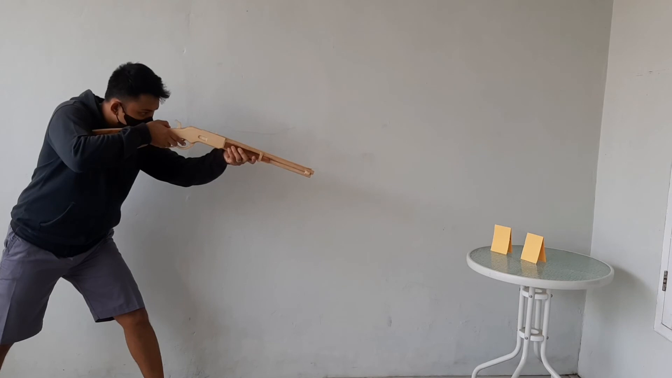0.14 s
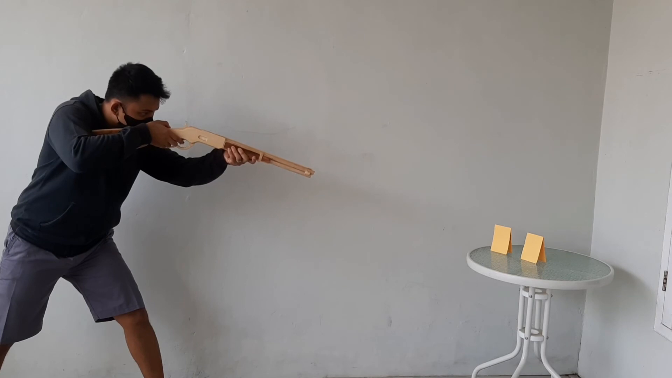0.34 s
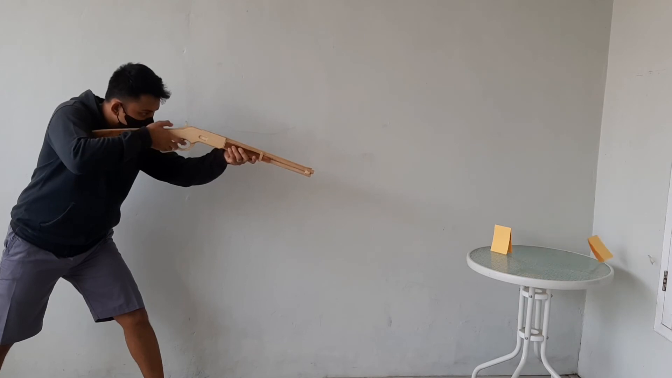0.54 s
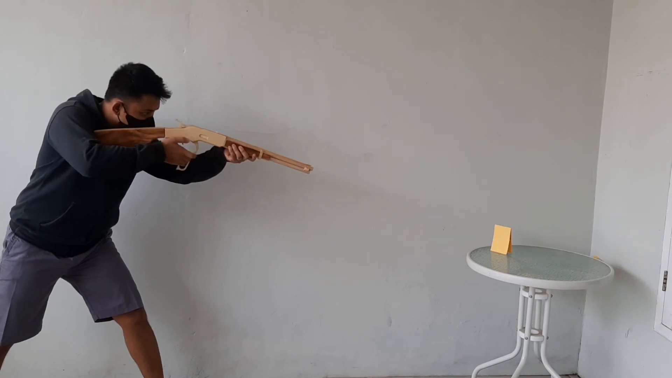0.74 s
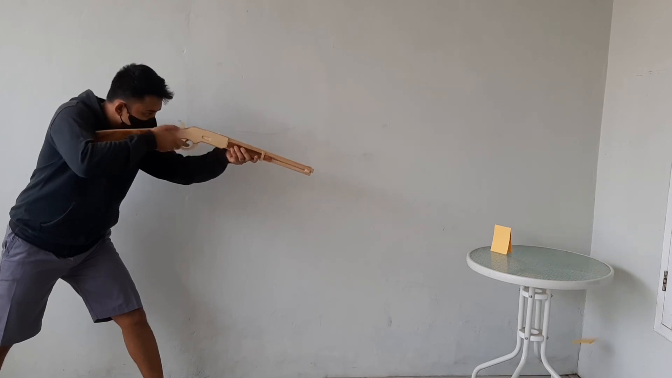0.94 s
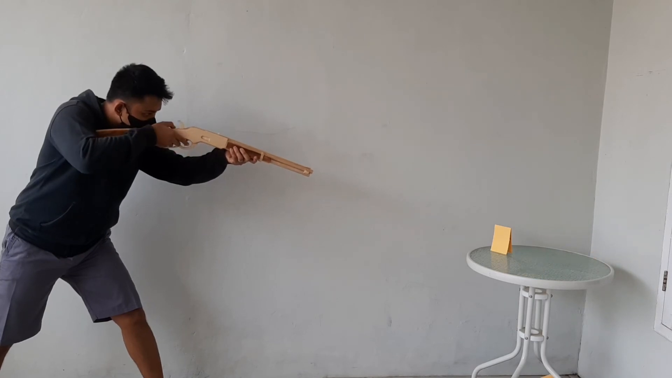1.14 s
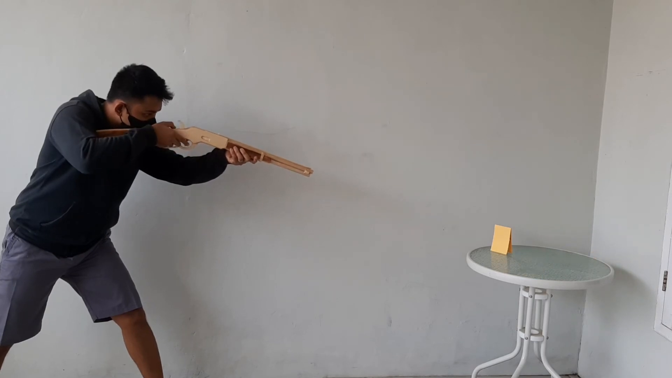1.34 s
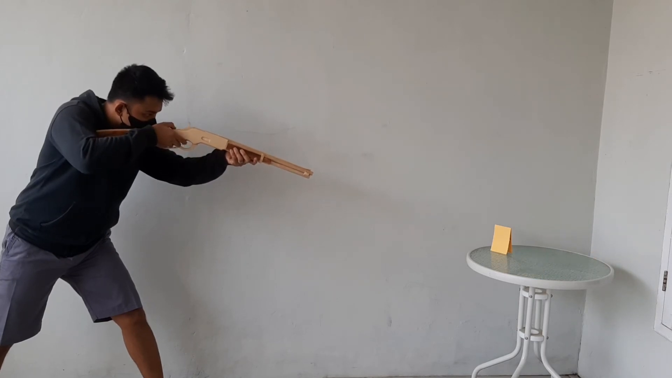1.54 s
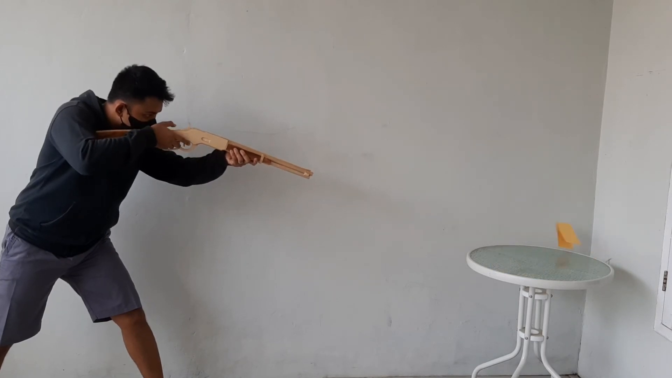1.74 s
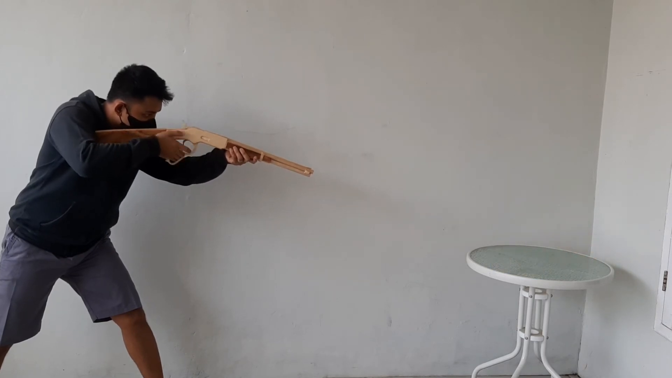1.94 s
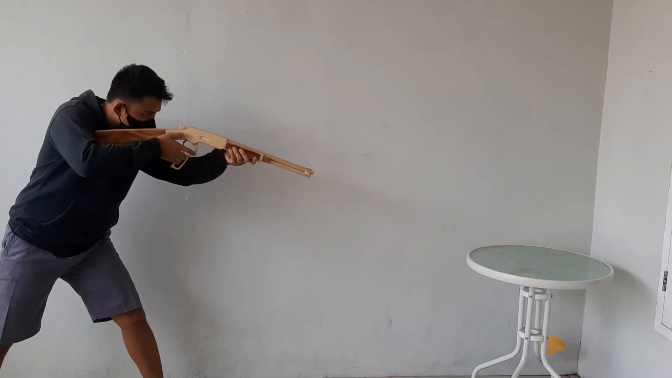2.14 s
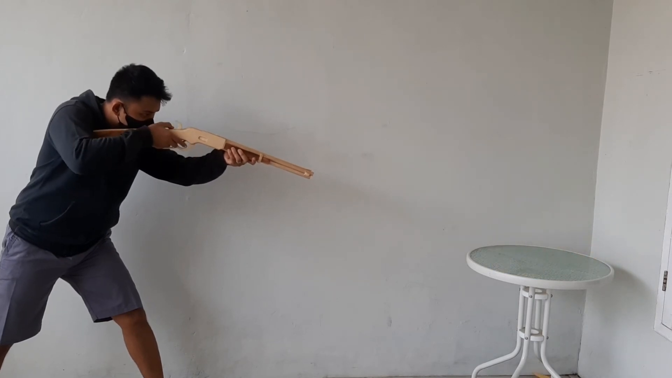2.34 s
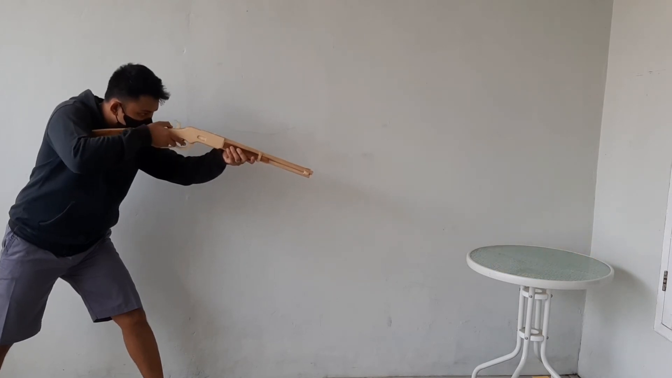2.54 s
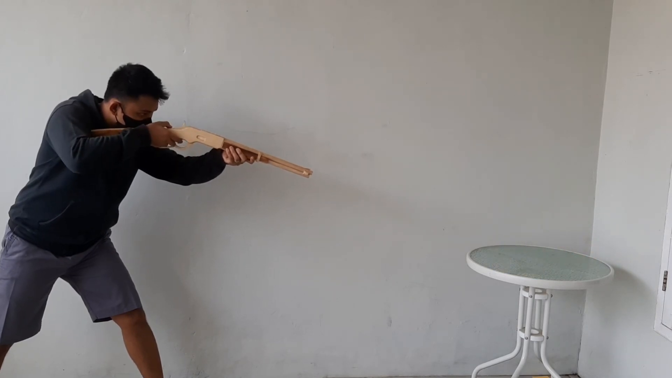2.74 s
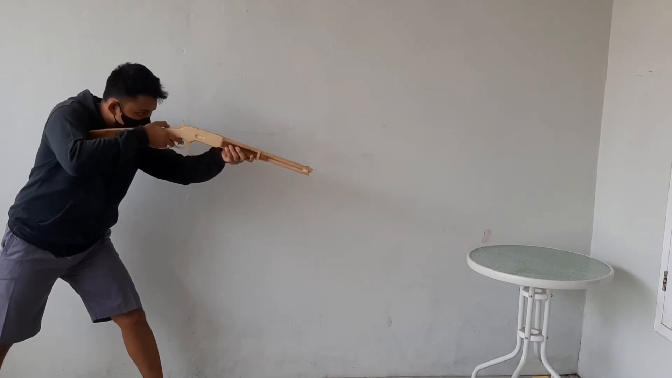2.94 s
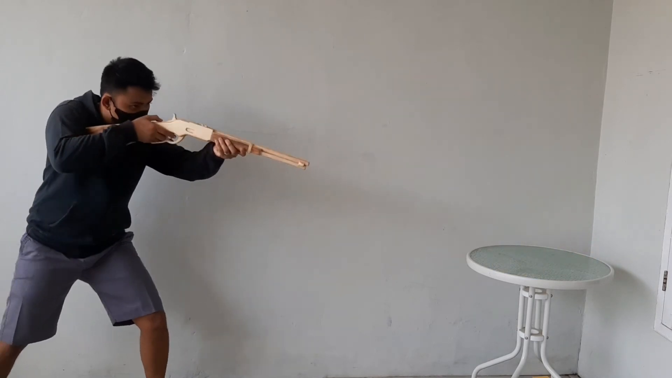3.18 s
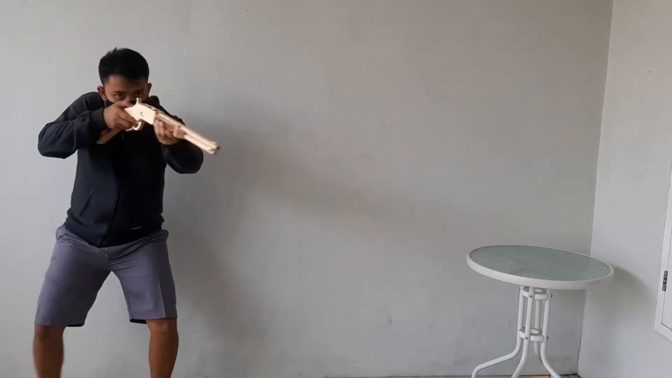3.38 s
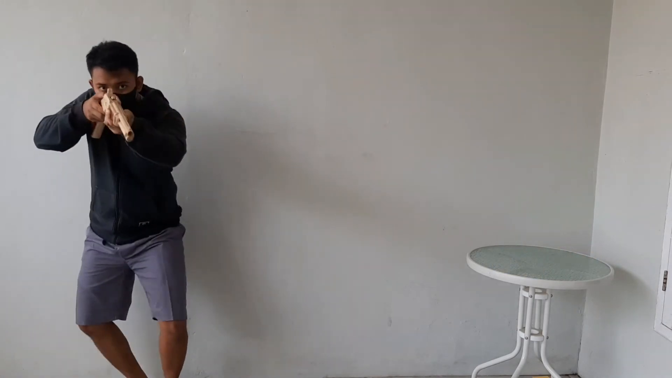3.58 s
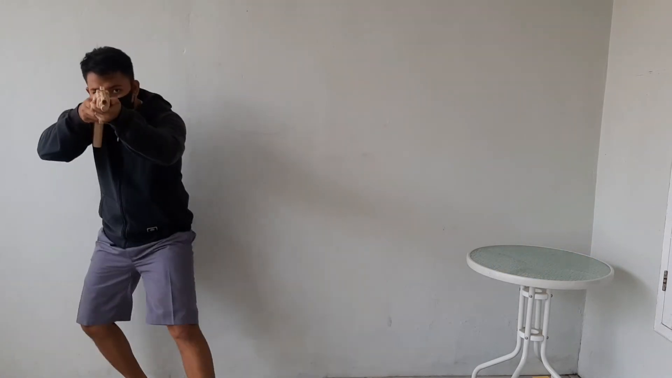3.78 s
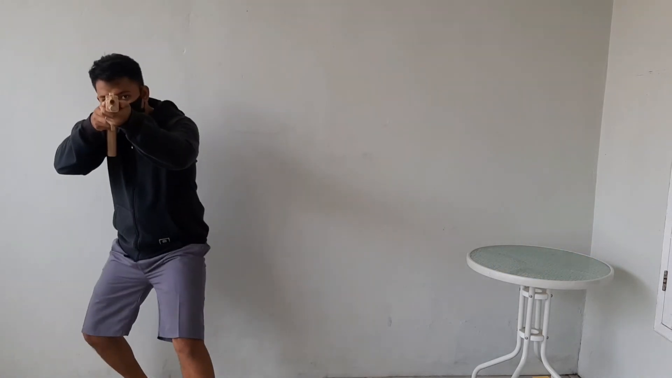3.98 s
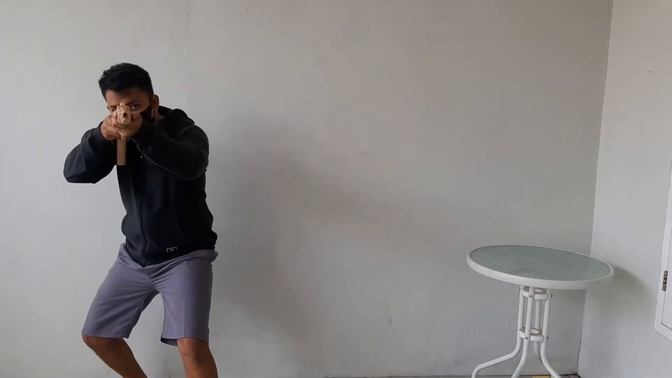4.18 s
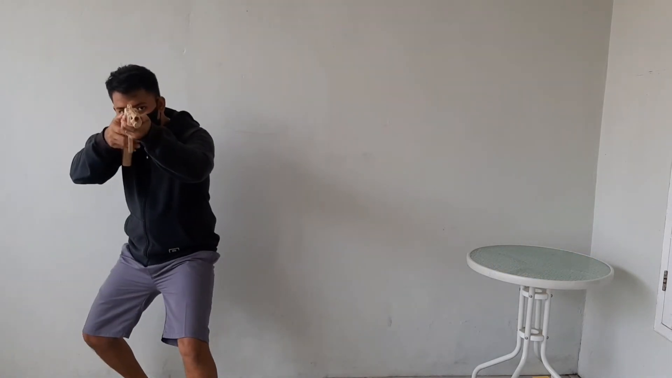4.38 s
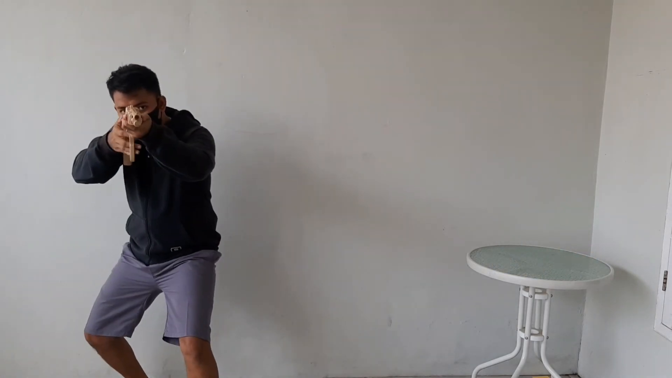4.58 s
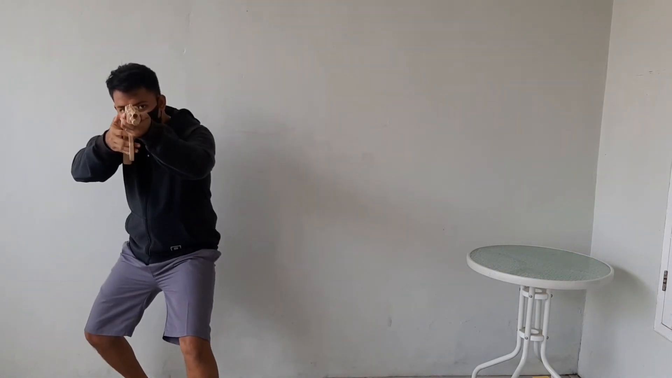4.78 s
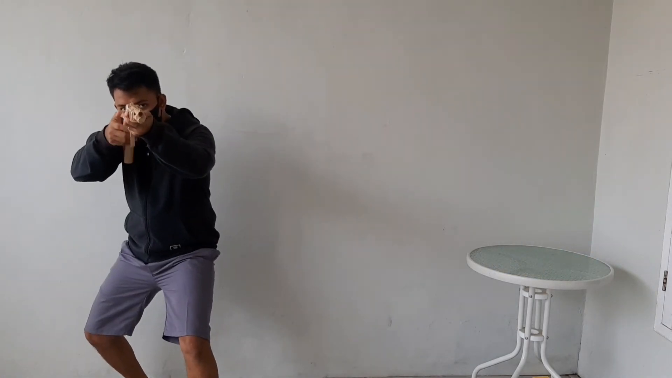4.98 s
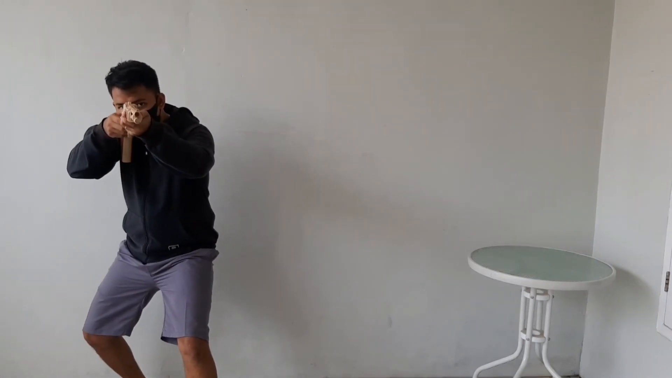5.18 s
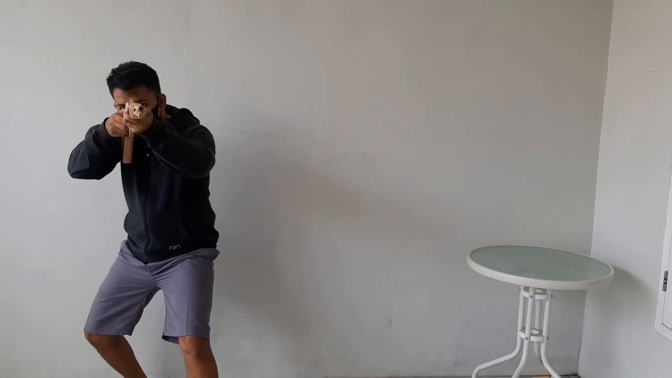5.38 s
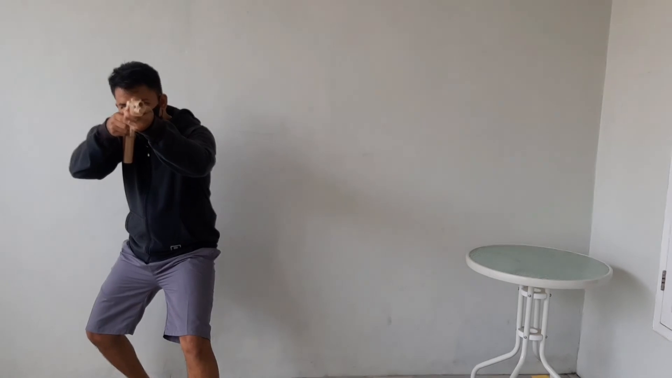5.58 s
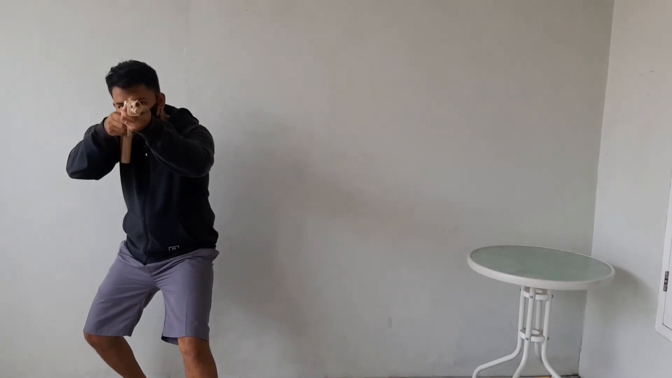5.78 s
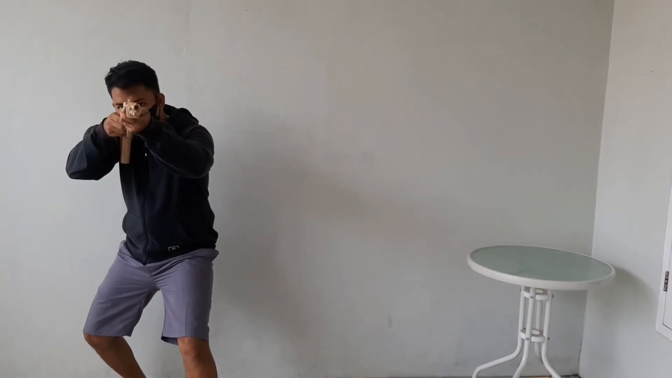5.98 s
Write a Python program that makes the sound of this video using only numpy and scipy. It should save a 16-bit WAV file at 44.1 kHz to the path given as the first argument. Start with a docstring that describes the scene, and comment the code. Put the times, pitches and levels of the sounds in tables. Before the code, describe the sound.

A wooden toy rifle fires a rubber band at about 0.4 seconds with a sharp snap, followed at once by a papery slap and low puff as a card is hit. The lever clacks at 0.6 and ticks shut around 1 second, and the card taps the floor twice near 1.2. A second shot and slap come at 1.6, then a lever clack at 2 seconds, faint card bounces and a cluster of small ticks near 2.3. A third shot snaps alone at 2.7. Feet scuff faintly at 3.6. The lever clacks again at 4.4, and a few soft clicks follow around 5 seconds. Every knock has a bright echo from the bare room's hard walls. A very quiet low hum, distant street noise and barely audible thin tones sit behind, heard through a stereo microphone a few steps away, with only background remaining until 6 seconds.

```python
"""A wooden toy rifle fires rubber bands and is re-cocked in a bare room with hard walls.
Each shot, lever clack and tick is a short crack that makes the rifle's parts ring for a moment.
The bands slap two card targets off a table, and the cards tumble to the floor.
The room gives every knock a long, bright echo. Behind it all are a low hum, faint far tones,
distant street noise and one scuff of feet, heard through a stereo microphone a few steps away."""
import sys
import numpy as np
from scipy import signal
from scipy.io import wavfile
from scipy.ndimage import uniform_filter1d

SR = 44100
rng = np.random.default_rng(int(sys.argv[2]) if len(sys.argv) > 2 else 0)


def transcribe(signal):
    """Save signal, clipped to [-1, 1], as a 16-bit WAV file at the path in sys.argv[1]."""
    frames = np.atleast_2d(signal).T
    limited = np.clip(frames, -1, 1)
    pcm = np.round(limited * 32767).astype(np.int16)
    wavfile.write(sys.argv[1], SR, pcm)


N = 265482

# How alike the background noise is left and right. Each row: frequency in Hz, likeness (1 is the same).
BACKGROUND_LIKENESS = [(60, 0.82), (180, 1), (550, 0.51), (1650, -0.47), (4970, 0.3), (15000, -0.17)]


def amp(db):
    """Turns decibels into a number to multiply by."""
    return 10 ** (np.asarray(db) / 20)


def value_at(table, hz):
    """Looks up a frequency in a table, blending between rows on a log-frequency scale."""
    row_hz, value = np.transpose(table)
    return np.interp(np.log(hz + 1), np.log(row_hz + 1), value)


def unit(x):
    """Scales a sound to an energy of 1."""
    return x / np.linalg.norm(x)


def add(mix, start_s, sound):
    """Mixes a stereo sound in at its start time."""
    part = mix[:, round(start_s * SR):][:, :sound.shape[1]]
    part += sound[:, :part.shape[1]]


def noise(shape, likeness, length, size):
    """Stereo noise built in short overlapping frames; shape(hz, s) is its gain by frequency and time."""
    hz = np.fft.rfftfreq(size, 1 / SR)[:, None]
    s = np.arange(4 * length // size + 5) * size / 4 / SR
    a, b, c, d = rng.standard_normal((len(s), len(hz), 4)).T
    alike = np.clip(value_at(likeness, hz), -1, 1)
    left = a + 1j * b
    right = alike * left + np.sqrt(1 - alike ** 2) * (c + 1j * d)
    spectra = np.array([left, right]) * shape(hz, s)
    return signal.istft(spectra, nperseg=size, noverlap=3 * size // 4)[1][:, :length]


def street():
    """Distant street noise: a soft wash that flutters and slowly comes and goes."""
    # The street's tone colour. Each row: frequency in Hz, relative level in dB.
    spectrum = [(82, -27.5), (140, -2.5), (221, -10.5), (460, -16), (644, -20), (712, -24.5), (1240, -23.5),
                (2040, -22), (2850, -29.5), (5820, -32.5), (8650, -41.5), (11900, -37), (16000, -39.5)]
    # Its slow rise and fall. Each row: time in seconds, boost in dB.
    swell = [(0, 2), (1.5, 4), (3.3, 0), (4.2, 0.5), (5.3, 5.5), (6.02, 2.5)]

    def shape(hz, s):
        rates_hz = np.geomspace(.3, 5, 16)
        flutter = sum(np.sin(2 * np.pi * (f * s + rng.random())) / np.sqrt(f) for f in rates_hz)
        return amp(value_at(spectrum, hz) + 0.16 * flutter + np.interp(s, *np.transpose(swell)))
    wash = noise(shape, BACKGROUND_LIKENESS, N, size=2048)
    return amp(-61) * wash / wash.std()


def feet(peak_s=3.59, peak_db=-59, rise_s=0.063, fade_db_per_s=69):
    """Feet turn on the floor: one brief, hissy scuff."""
    hiss = noise(lambda hz, s: 1 / (1 + (2200 / (hz + 1)) ** 2) / (1 + hz / 5000),
                 BACKGROUND_LIKENESS, N, size=256)
    since_peak = np.arange(N) / SR - peak_s
    rise = np.clip(1 + since_peak / rise_s, 0, 1) ** 2
    fade = amp(peak_db - fade_db_per_s * np.maximum(since_peak, 0))
    return rise * fade * hiss / hiss.std()


def hum():
    """Two low drones, each a tone that wavers in pitch with a fuzzy rumble around it."""
    # How loud the drones are. Each row: time in seconds, lower drone in dB, upper drone in dB.
    levels = [(0, -69, -63), (0.4, -55.5, -59), (1.4, -65, -67), (2.0, -62, -61.5), (2.801, -64.5, -58.5),
              (3.1, -62, -61), (3.5, -63, -68.5), (3.66, -62, -62), (4.1, -59, -65.5), (4.85, -60.5, -60.5),
              (5.1, -61, -48.5), (5.25, -56, -50.5), (5.43, -61.5, -68), (6.02, -57.5, -65.5)]
    times, lower_db, upper_db = np.transpose(levels)
    t, out = np.arange(N) / SR, 0
    for hz, waver_hz, width_hz, fuzz_db, db in (66, 4, 14, -2, lower_db), (124, 2.5, 18, -5, upper_db):
        drift = uniform_filter1d(uniform_filter1d(rng.standard_normal(N), 3000), 3000)
        cycles = np.cumsum(hz + waver_hz * drift / drift.std()) / SR
        fuzz = noise(lambda f, _: 1 / (1 + ((f - hz) / width_hz) ** 2), BACKGROUND_LIKENESS, N, size=4096)
        drone = np.sqrt(2) * np.sin(2 * np.pi * cycles) + amp(fuzz_db) * fuzz / fuzz.std()
        out = out + amp(np.interp(t, times, db)) * drone
    return out * amp([[1.1], [-1.1]])  # a little louder on the left


def whistles():
    """Thin, slightly fuzzy tones that fade in and out far away."""
    # Each row: start in seconds, end in seconds, pitch in Hz, level in dB.
    far_tones = [(3.1, 3.75, 2700, -80), (4.1, 4.45, 2700, -77), (5.3, 5.65, 2700, -78),
                 (3.36, 3.55, 1340, -75), (4.25, 4.42, 1350, -76), (2.6, 4.1, 440, -71)]
    out = np.zeros((2, N))
    for start, end, hz, db in far_tones:
        t = np.arange(round((end - start) * SR)) / SR
        sway = uniform_filter1d(rng.standard_normal((2, 2, len(t))), 1500)
        tone = sway[0] * np.sin(2 * np.pi * hz * t) + sway[1] * np.cos(2 * np.pi * hz * t)
        add(out, start, amp(db) * tone / tone.std() * signal.windows.tukey(len(t), .6))
    return out


def room(sound, direct_boost_db, pan_db=0):
    """Sound arrives directly, then off a few hard walls, then as a tail of blended echoes."""
    # How long the tail lasts. Each row: frequency in Hz, seconds to fade by 60 dB.
    fade_times = [(250, 0.65), (660, 0.87), (1740, 0.67), (3000, 0.7), (5000, 0.67), (7500, 0.6),
                  (10000, 0.52), (14000, 0.39)]
    # How alike the tail is left and right. Each row: frequency in Hz, likeness (1 is the same).
    likeness = [(60, .84), (240, .72), (950, .2), (3770, -.1), (15000, .0)]
    # The first wall echoes. Each row: delay in seconds, left and right level in dB above the tail.
    wall_echoes = [(.0055, 15, 13.5), (.0075, 13, 13.5), (.0095, 12, 10.5), (0.0221, 12, 14.5),
                   (0.025, 10, 11.5), (.041, 10, 8.5)]
    t = np.arange(36000) / SR
    tail = noise(lambda hz, s: amp(-60 * s / value_at(fade_times, hz)), likeness, len(t), size=256)
    tail = tail / np.sqrt(256 / 3)
    build_up = 1 - np.exp(-t / 0.0033)
    # echoes between bare walls arrive in clumps before they blend
    clumps = uniform_filter1d(uniform_filter1d(rng.standard_normal(len(t)), 130), 130)
    response = tail * build_up * amp(2.1 * np.exp(-t / 0.12) * clumps / clumps.std())
    response[[0, 1], [0, 2]] += amp(14 + direct_boost_db)  # the direct sound reaches the left first
    for delay_s, *db in wall_echoes:
        # the two sides hear each wall a few samples apart
        response[[0, 1], round(delay_s * SR) + rng.integers(0, 12, 2)] += amp(db)
    return signal.fftconvolve(sound[None], response, axes=1) * amp([[pan_db / 2], [-pan_db / 2]])


def crack(tilt_db_per_octave, grit_db=-15, contact_s=.0015):
    """Two surfaces meet: a click, brighter for harder contact, then a moment of grit as they settle."""
    hz = abs(np.fft.fftfreq(2048, 1 / SR)) + 1
    log_gain = np.log(amp(tilt_db_per_octave * np.log2(np.maximum(hz, 1000) / 3000)))
    click = np.fft.ifft(np.exp(np.conj(signal.hilbert(log_gain)))).real  # puts the energy at the start
    grit = amp(grit_db) * rng.standard_normal(400) * np.exp(-np.arange(400) / SR / contact_s)
    return unit(click + np.convolve(click, grit)[:2048])


def ring(hz, db, fade_s):
    """One tone of a struck part: db sets its energy, and it drops 60 dB in fade_s."""
    t = np.arange(2048) / SR
    return amp(db) * unit(amp(-60 * t / fade_s) * np.sin(2 * np.pi * hz * t))


def radiate(x, low_hz):
    """Small things send out little bass: cuts the lows, then scales to an energy of 1."""
    return unit(signal.sosfilt(signal.butter(4, low_hz, "high", fs=SR, output="sos"), x))


def slap(tilt_db_per_octave, edge_db, fold_db):
    """One papery slap: a crack, the card's bright edge and its hollow fold."""
    # The tones of the fold, then of the edge. Each: pitch in Hz, level in dB, seconds to fade by 60 dB.
    card_tones = [
        [(410.3, 8.5, 0.0081), (920, -2.5, 0.0092)],
        [(2420, -10, .002), (3750, -4, 0.00078), (7650, -13.5, .004)],
    ]
    fold, edge = (sum(ring(*tone) for tone in part) for part in card_tones)
    snap = radiate(crack(tilt_db_per_octave) + amp(edge_db) * edge, 800)
    return snap + amp(fold_db) * radiate(fold, 170)


def cards():
    """Bands strike the cards, which push a low puff of air as they fly, then bounce on the floor."""
    # A band hits a card. Each row: start in seconds, slap level in dB, puff level in dB.
    hits = [(.435, -23, -53), (.450, -25, -20.5), (1.636, -21.5, -29.5)]
    # A card lands or bounces. Each row: start in seconds, slap level in dB, edge ring in dB.
    landings = [(1.1675, -42.5, -3.5), (1.3399, -43.5, 2.5), (1.935, -53.5, -7), (2.112, -46.5, -30.5)]
    out, t = np.zeros((2, N)), np.arange(3000) / SR
    puff = np.sin(2 * np.pi * (150 * t - 1500 * t ** 2)) * (t / 0.011) * np.exp(1 - t / .008)
    for s, db, puff_db in hits:
        hit = slap(tilt_db_per_octave=-0.5, edge_db=-10, fold_db=-22.5)
        add(out, s, amp(db) * room(hit, direct_boost_db=7, pan_db=-0.1))
        add(out, s, amp(puff_db) * np.array([puff, -.1 * puff]))
    for s, db, edge_db in landings:
        landing = slap(tilt_db_per_octave=-6, edge_db=edge_db, fold_db=-9)
        add(out, s, amp(db) * room(landing, direct_boost_db=8.5))
    return out


def knock(start_s, tilt_db_per_octave, **part_db):
    """One knock inside the rifle: a crack, the ring of its parts and a faint thud of the whole body."""
    # The tones of the stock, lever, latch, barrel slats and lever pin, one group for each.
    # Each tone: pitch in Hz, level in dB, seconds to fade by 60 dB.
    part_tones = [
        [(1495, -1.5, 0.015), (1690, -9.5, 0.015)],
        [(2120, -4, 0.025), (2440, -9, 0.0071), (2700, -13, 0.022)],
        [(5050, -5, 0.035), (4894, -13, .06), (5250, -12, 0.029), (5120, -13.5, .012)],
        [(4100, -2.5, 0.0013), (6810, -7, 0.0016)],
        [(9410, -6.5, .006)],
    ]
    parts = zip(("stock", "lever", "latch", "slats", "pin"), part_tones)
    ringing = sum(amp(part_db[name]) * ring(*tone) for name, tones in parts for tone in tones)
    facing = start_s > 3.5  # once the rifle points at the listener, its thud is higher and louder
    body_hz, body_db, fade_s = (870, -20.5, 0.0099) if facing else (644, -32, 0.0075)
    thud = amp(body_db) * radiate(ring(body_hz, 0, fade_s), 300)
    return radiate(crack(tilt_db_per_octave) + ringing, 1700) + thud


def rifle():
    """The toy rifle's sharp shots, hard lever clacks and soft ticks, each echoing in the room."""
    # The latch lets a band go. Each row: start in seconds, level in dB,
    # then the ring of stock, latch and slats in dB.
    shots = [(0.4102, -15, -33, 1, 0), (1.6084, -14.5, -5, 3.5, -5), (2.7369, -16, -10, 5.5, -11.5)]
    # The lever is thrown open against its stop. Each row: start in seconds, level in dB,
    # then the ring of stock, lever, latch and pin in dB.
    clacks = [(0.6453, -23.5, -11, -15, -20, -8.5), (1.9688, -25, -11, -8, -15, -2.5),
              (4.4415, -28.5, -21, -16, -5, -2.5), (4.454, -28, -28, -15, -11.5, -24)]
    # The trigger and the closing lever tick. Each row: start in seconds, level in dB,
    # then the ring of stock and latch in dB.
    ticks = [(0.384, -52.5, 7.5, -21), (.977, -46.5, 6.5, -27.5), (1.026, -41, -11.5, -8.5),
             (2.271, -48.5, 1.5, -22.5), (2.295, -49.5, 16, -23), (2.317, -45, 12.5, -11.5),
             (2.340, -46, -3.5, -22), (2.704, -55.5, 10, -21), (4.428, -55, -3, -7), (4.998, -59.5, 1, -22),
             (5.034, -46.5, -3, -19.5), (5.04, -44, 4, -19), (5.092, -36.5, -11.5, -17.5)]
    out = np.zeros((2, N))
    for s, db, stock, latch, slats in shots:
        shot = knock(s, tilt_db_per_octave=-3, stock=stock, lever=-12.5, latch=latch, slats=slats,
                     pin=-13.5)
        add(out, s, amp(db) * room(shot, direct_boost_db=-8))
    for s, db, stock, lever, latch, pin in clacks:
        clack = knock(s, tilt_db_per_octave=-2.5, stock=stock, lever=lever, latch=latch, slats=-7.5,
                      pin=pin)
        add(out, s, amp(db) * room(clack, direct_boost_db=1))
    for s, db, stock, latch in ticks:
        tick = knock(s, tilt_db_per_octave=-7, stock=stock, lever=-2, latch=latch, slats=-18, pin=-28)
        add(out, s, amp(db) * room(tick, direct_boost_db=2.3))
    return out


def scene():
    """The rifle and the cards over the quiet background."""
    return rifle() + cards() + street() + feet() + hum() + whistles()


def record(dry, bottom_hz=40, top_hz=16650):
    """The microphone colours the sound, softly squashes loud peaks and cuts the extreme lows and highs."""
    # Its tone colour, with a dip in the treble. Each row: frequency in Hz, gain in dB.
    colour = [(20, -3.5), (8000, 4.5), (8400, -1.5), (9000, -4.5), (9500, 3.5), (15100, 3), (15500, -21.5),
              (16500, -32)]
    # How its two sides differ. Each row: frequency in Hz, left minus right in dB.
    balance = [(60, -8.5), (180, -3), (550, -3), (1650, -2), (4970, -2.5), (15000, 1.5)]
    hz = np.linspace(0, SR / 2, 513)
    gains = [amp(value_at(colour, hz) + side * value_at(balance, hz)) for side in (.5, -.5)]
    filters = np.array([signal.firwin2(511, hz, gain, fs=SR) for gain in gains])
    coloured = signal.oaconvolve(dry, filters, "same", axes=1)
    squashed = np.tanh(coloured / 0.96) * 1.114
    trimmed = signal.lfilter(*signal.butter(2, bottom_hz, "high", fs=SR), squashed)
    treble_cut = signal.firwin(1023, top_hz, window=("kaiser", 10), fs=SR)
    return signal.oaconvolve(trimmed, treble_cut[None], "same")


dry = scene()
out = record(dry)
transcribe(out)
```